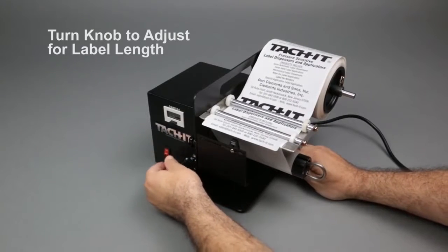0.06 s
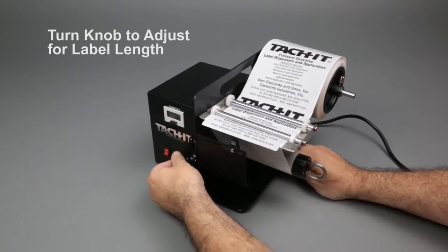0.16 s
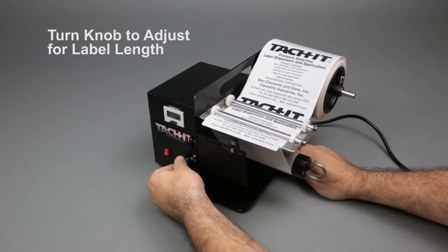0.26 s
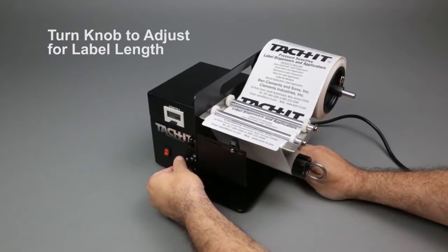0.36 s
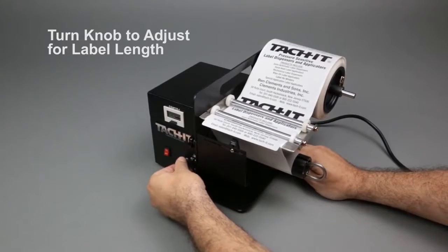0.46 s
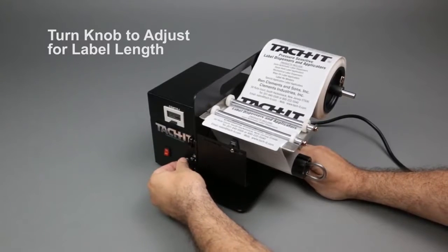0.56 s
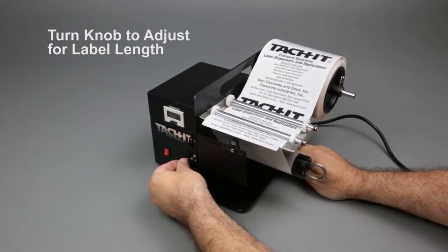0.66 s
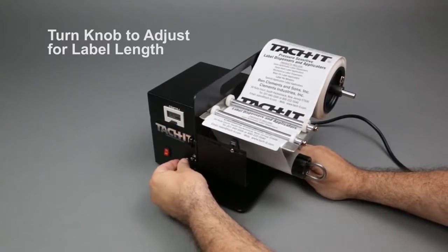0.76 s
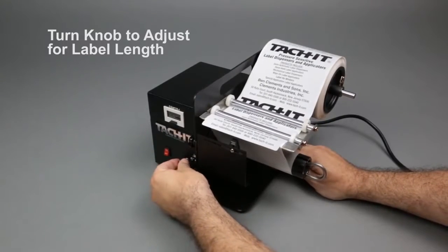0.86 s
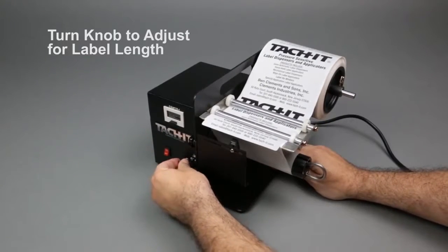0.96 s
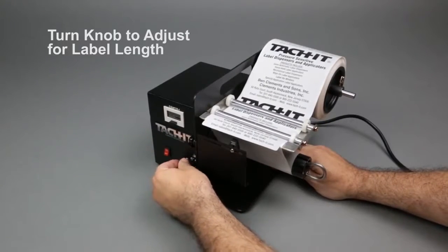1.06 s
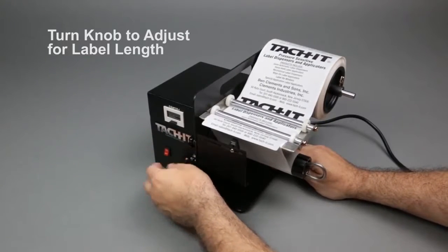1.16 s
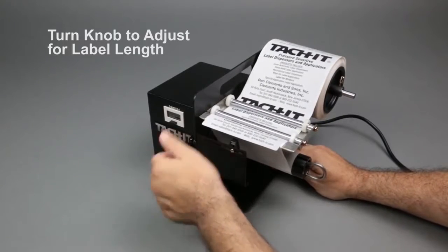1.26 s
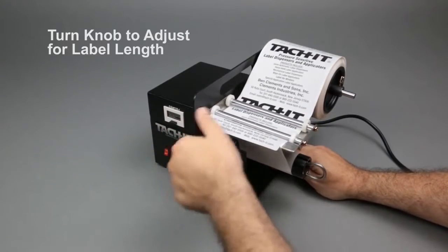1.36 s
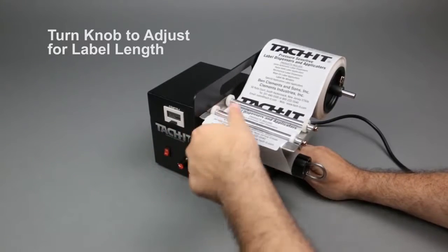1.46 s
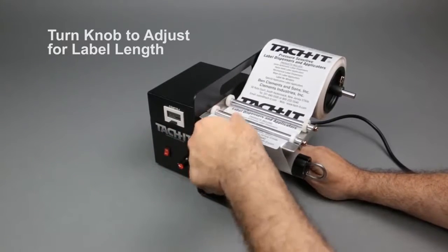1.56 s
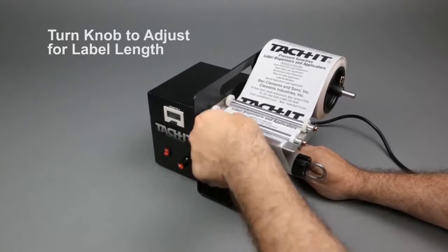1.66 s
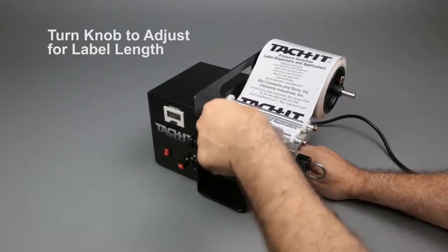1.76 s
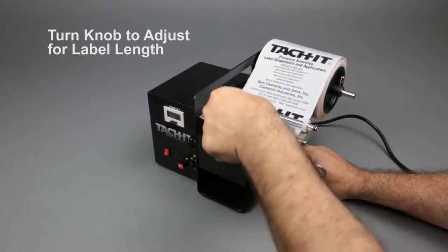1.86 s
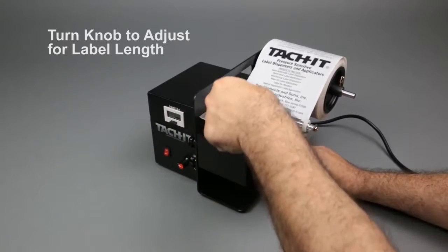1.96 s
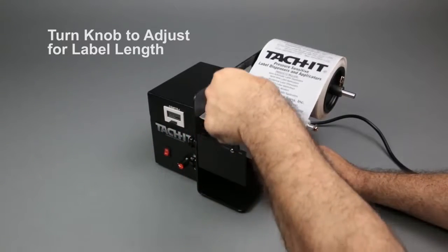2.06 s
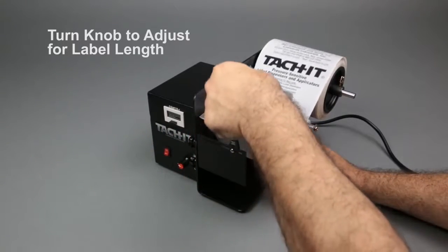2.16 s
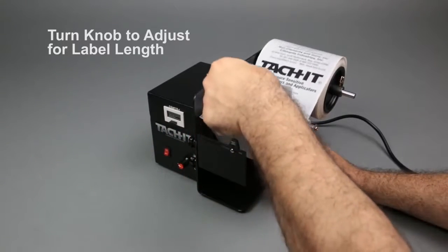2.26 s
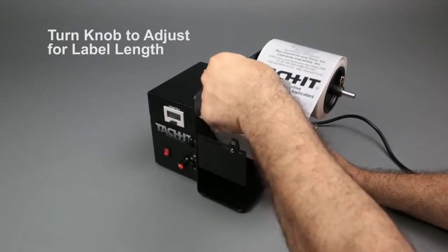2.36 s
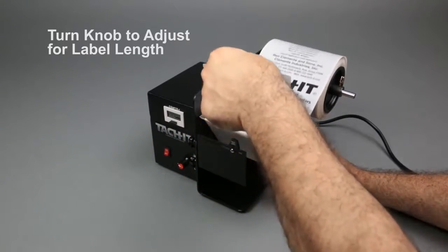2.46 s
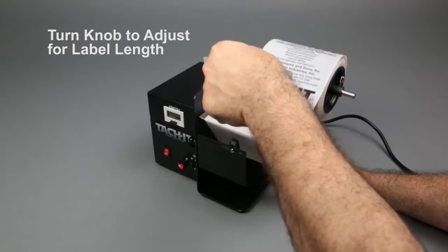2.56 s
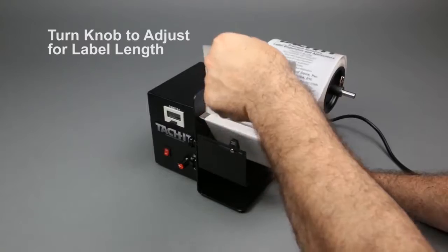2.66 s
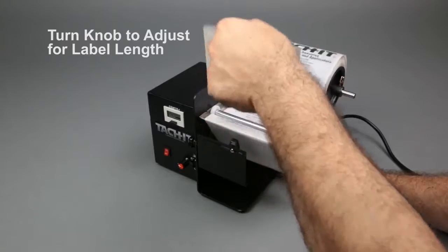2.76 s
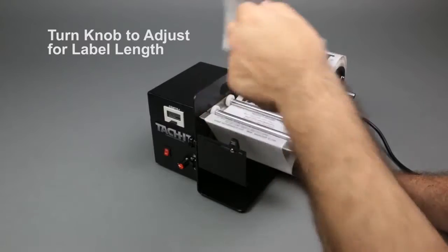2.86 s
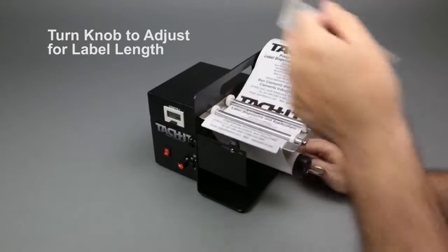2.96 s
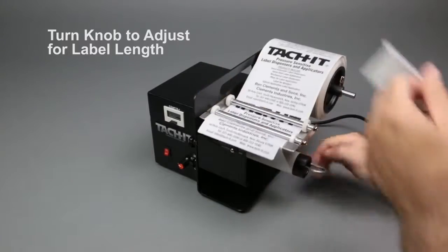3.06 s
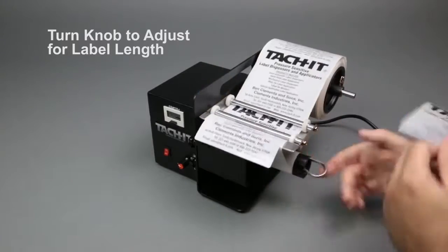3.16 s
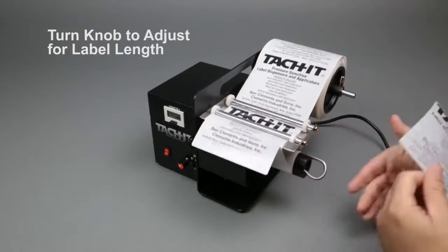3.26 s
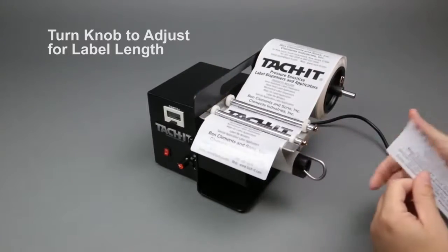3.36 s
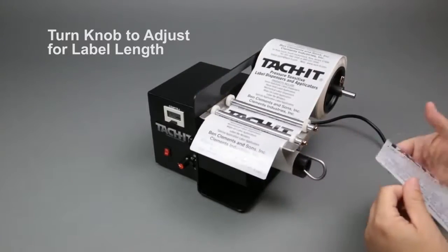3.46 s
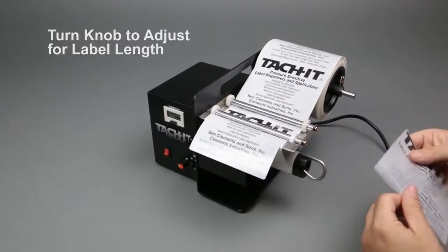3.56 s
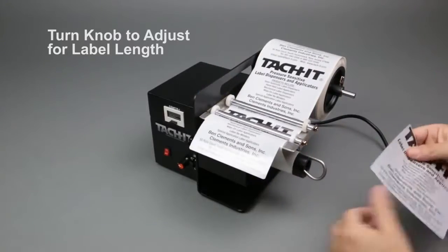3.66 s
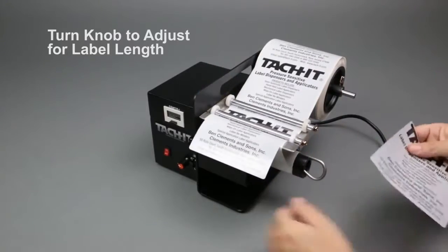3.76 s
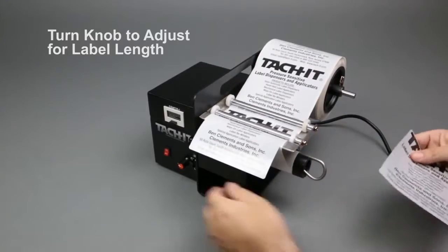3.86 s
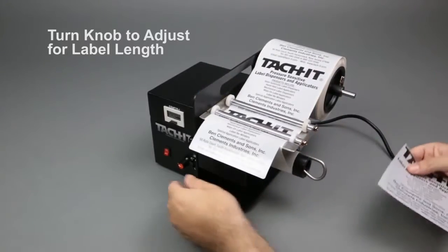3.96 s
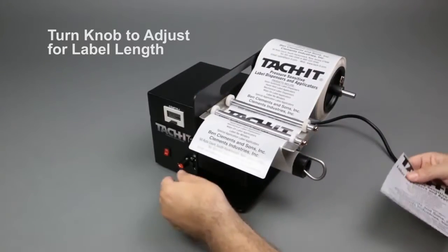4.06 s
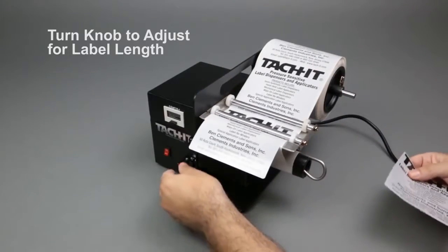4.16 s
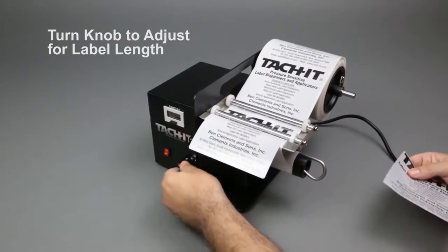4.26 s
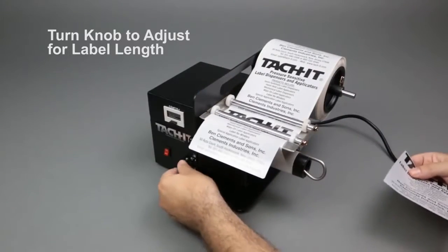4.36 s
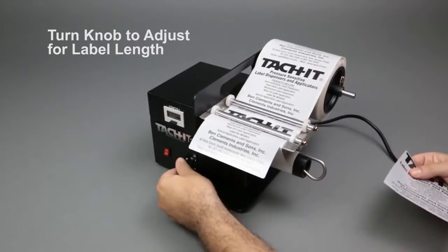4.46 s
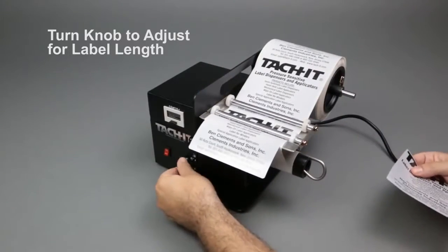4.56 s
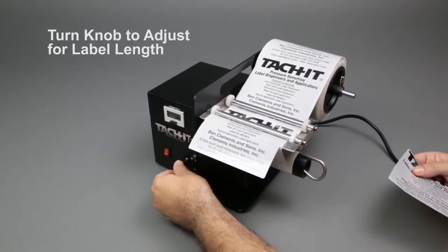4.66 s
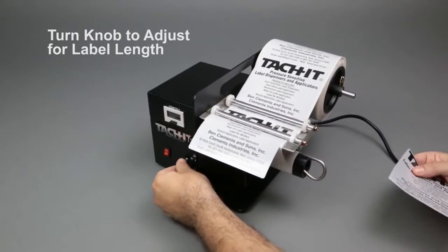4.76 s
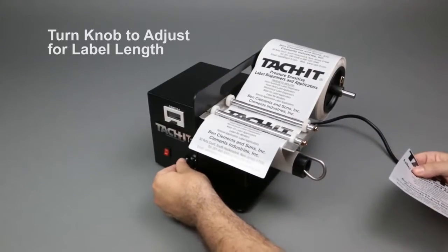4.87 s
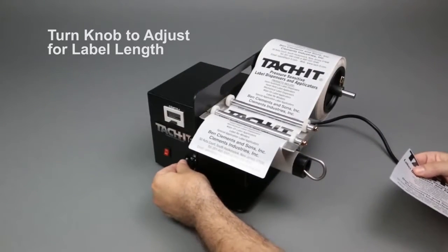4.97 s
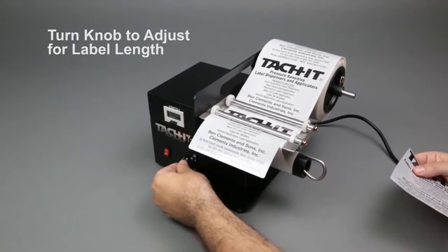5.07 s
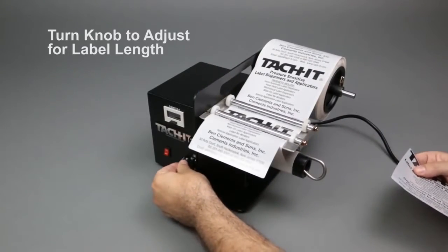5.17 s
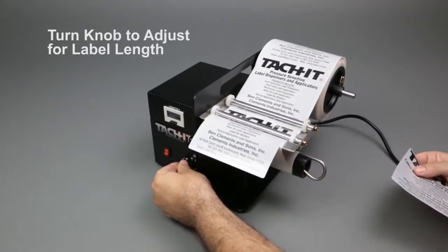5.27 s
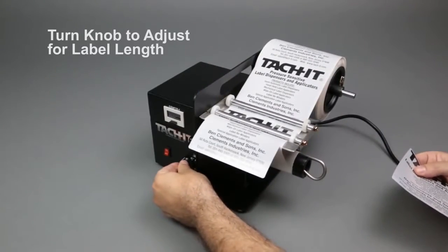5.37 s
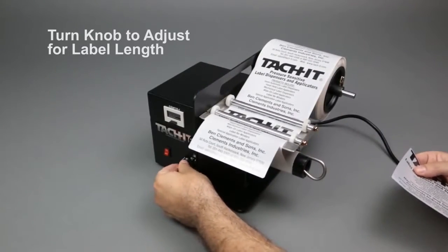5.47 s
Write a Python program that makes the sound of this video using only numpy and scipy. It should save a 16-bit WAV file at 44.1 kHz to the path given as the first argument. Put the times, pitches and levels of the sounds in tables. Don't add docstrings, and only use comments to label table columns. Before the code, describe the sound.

Quiet ticks, then one buzzy motor run with crisp adhesive peeling, a hard knock, a dull stopping clunk and brief sticky crackling in a quiet room.

```python
import sys
import numpy as np
from scipy import signal
from scipy.fft import rfft, irfft
from scipy.io import wavfile
from scipy.ndimage import uniform_filter1d

SR = 44100
rng = np.random.default_rng(int(sys.argv[2]) if len(sys.argv) > 2 else 0)


def store_pcm(level_fs):
    pcm = np.round(np.clip(level_fs, -1, 1) * 32767).astype(np.int16)
    wavfile.write(sys.argv[1], SR, np.atleast_2d(pcm).T)


def voltage_ratio(level):
    return 10 ** (np.asarray(level, float) / 20)


N = 243873
TIME = np.arange(N) / SR

# pitch_hz, width_hz, level_db
HOUSING_MODES = [(225, 46, -7), (292, 12.8, 4.5), (401, 47, 0.5), (683, 30, -2), (828, 63, -4),
                 (1200, 650, -17.5), (1430, 57, -13), (585, 490, -8)]
# pitch_hz, width_hz, level_db
GEARBOX_MODES = [(2650, 90, -7), (3160, 110, -7), (3710, 120, 1), (4230, 80, -8), (4910, 200, -5),
                 (6100, 200, -11), (7290, 150, -16), (9010, 200, -22)]
# pitch_hz, density_db_per_hz
GEAR_WASH = [(530, -41), (900, -6.5), (1230, -15), (1350, -11), (2200, -10), (2630, -6), (3770, -3.5),
             (6760, -9.5), (8580, -19), (11700, -21.5), (15600, -31)]
# pitch_hz, density_db_per_hz
PEEL_WASH = [(530, -22), (900, -10), (1270, -37), (1400, -7), (1650, -6.5), (2030, -1.5), (2310, -9),
             (3150, -0.5), (5650, 1.5), (6930, -1), (8480, -10), (11400, -12.5), (15600, -25)]
# pitch_hz, width_hz, level_db
LABEL_MODES = [(1370, 83, -6), (1980, 140, -5), (2650, 42, -6), (3150, 130, -2), (3760, 89, -2),
               (4510, 150, -2), (5020, 180, 0), (5460, 39, -3), (6120, 160, -3), (6890, 200, -4),
               (7480, 170, -7), (8120, 36, -10), (8770, 310, -13), (9870, 230, -15)]
# time_s, level_db
PULL = [(1.9, -65), (1.954, -45), (2.01, -49.5), (2.07, -44), (2.39, -42.5), (2.73, -43.5), (2.792, -45),
        (2.945, -48)]
# time_s, level_db
LOAD = [(1.91, -52.5), (1.986, -48), (2.04, -55.5), (2.088, -46), (2.3, -46), (2.67, -48), (2.748, -44),
        (2.885, -52), (2.95, -50)]
# centre_s, level_db, half_length_s
DRAGS = [(1.988, -65, .025), (2.09, -65, 0.025), (2.172, -60, .025), (2.27, -53, 0.032), (2.339, -63, .04),
         (2.514, -62, .07), (2.77, -57, .05), (3.0, -55.5, .06)]
# start_s, peak_db, body_hz, t60_s, bright_edge_db (re peak_db)
SNAPS = [(3.643, -50, 1790, 0.066, -14), (3.649, -44, 2500, .03, -1), (3.6525, -29, 2200, .04, -15),
         (3.656, -36, 580, 0.046, -4), (3.6635, -32, 1500, 0.031, -7), (3.671, -31, 910, 0.051, -11),
         (3.674, -32, 2500, 0.018, -9), (3.6795, -34, 1870, .028, -14), (3.688, -40.5, 1500, 0.14, -9),
         (3.726, -45.5, 7500, 0.16, -7), (3.732, -36.5, 1200, .04, -12), (3.7365, -29, 1300, 0.024, -2.5),
         (3.746, -41, 900, 0.091, -7), (3.7485, -35, 2450, 0.053, -13), (3.758, -51, 2000, 0.11, -8),
         (3.828, -50, 880, .043, -22)]
# pitch_hz, width_hz, level_db
HELD_SHEET = [(526, 110, -2), (1060, 180, -3), (1450, 71, -12), (2200, 210, 2.5), (2570, 180, -3),
              (2900, 180, -1), (4320, 390, -5), (7600, 420, -9)]
# start_s, peak_db, contact_ms, ring_scale (of t60), panel_hz
KNOCKS = [
    (1.91, -41, 0.98, 0.66, 378),
    (3.056, -24, 0.2, 0.055, 355),
]
# pitch_hz, level_db, t60_s
HOUSING_RING = [(590, -9, 0.065), (880, -16, 0.073), (1300, -14, .08), (1500, -19, 0.081),
                (3600, -11.5, 0.23)]
# start_s, peak_db, pitch_hz, width_octaves, after_ring_db (re tick)
TICKS = [(.115, -57, 3800, 1.2, -20), (0.1553, -44, 2900, 0.54, -14), (.1555, -53, 5700, .6, -25),
         (.188, -46.5, 3200, 1.4, -18), (1.506, -57.5, 3500, .5, 4), (1.657, -54, 3770, 1.4, -4),
         (1.906, -39, 7100, 1.6, -11), (3.2463, -25.5, 4300, 1.9, -27), (3.249, -28.5, 2000, 3.2, -25),
         (3.737, -33, 7600, 0.56, -15), (5.1449, -37.5, 3960, 0.42, -11), (5.1455, -50.5, 6170, 0.82, -25),
         (5.199, -52, 2700, .8, -15)]
# start_s, peak_db, pitch_hz, length_s
BRUSHES = [(1.527, -54.5, 5370, 0.079), (1.53, -59.5, 1100, 0.1), (1.689, -58, 4130, 0.27),
           (1.701, -61.5, 890, 0.14), (1.82, -57.5, 5400, 0.32)]
# start_s, peak_db, pitch_hz, t60_s
JOLTS = [(.131, -45, 230, 0.052), (.234, -55, 1140, 0.16), (.24, -63.5, 2920, 0.33), (1.92, -42, 1140, .12),
         (1.969, -35.5, 1500, 0.054), (2.725, -37.5, 1540, .1), (3.056, -31, 700, 0.025),
         (3.248, -40, 1500, 0.11), (3.404, -47, 2100, 0.21)]
# start_s, pitch_hz, level_db, swing (1 out, -1 in), t60_s
PANELS = [(.2338, 407, -41, 1, .21), (.2338, 443, -53, 1, .42), (.2338, 432, -54.5, -1, .46),
          (.2338, 372, -54, 1, .12), (.2338, 3570, -70, 1, .35), (.2338, 3600, -70, -1, .35),
          (1.506, 1640, -63, 1, .1), (1.53, 1690, -70, 1, .4), (1.506, 5850, -71, 1, .12),
          (3.384, 375, -30.5, 1, .085), (3.384, 410, -35, -1, .14), (3.384, 340, -41, -1, .22)]
# pitch_hz, density_db_per_hz
AIR = [(12, -43), (20, -17), (85, -8.5), (116, -4.5), (153, -11.5), (171, -3.5), (191, -2), (353, -8),
       (394, -12), (860, -15.5), (1050, -20), (1270, -20), (1540, -23), (3980, -31), (15600, -32.5)]
# pitch_hz, density_db_per_hz
SIDE_HISS = [(12, -15), (20, 7), (113, -6.5), (245, -11), (453, -9), (1630, -8), (15600, -7)]

START_S, STOP_S = 1.905, 3.373
COAST_LAG_S = 0.039
FREE_S = 2.945
DRIVE_END_S = 3.384


def dispenser():
    hiss = gears() + peeling()
    bounce_s = 1 / 625
    bounce = voltage_ratio(-22.5) * np.interp(TIME - bounce_s, TIME, hiss)
    return housing_rumble() + hiss + bounce + mains_hum()


def gears():
    teeth = clicks(12000, spread_db=1.3) * (1 + 0.3 * torque()) * voltage_ratio(0.8 * walk(30))
    damping = np.where(TIME < FREE_S, voltage_ratio(-10), 1)
    whine = level(resonate(teeth, GEARBOX_MODES, flicker_db=1.2, rate=35), -4)
    rattle = whine * damping * (TIME < DRIVE_END_S) + level(colour(teeth, GEAR_WASH), -1.63)

    taut_ease_s = 0.085
    taut = ramp(2.08, 2 * taut_ease_s) - ramp(2.71 - taut_ease_s, taut_ease_s)
    sag_db = 2.5 * (TIME - START_S)
    gain_db = -41 - sag_db - 7 * taut - 2.5 * swell(FREE_S + 0.023, 0.046)
    braked = voltage_ratio(-3 * ramp(STOP_S, COAST_LAG_S))
    return running() * braked * voltage_ratio(gain_db) * rattle


def peeling():
    snaps = clicks(12000, spread_db=1.6) * voltage_ratio(0.9 * walk(50) + 0.5 * walk(12))
    label = level(resonate(snaps, LABEL_MODES, flicker_db=2.5, rate=20), -2)
    label = label + level(colour(snaps, PEEL_WASH), 1.0)
    return label * voltage_ratio(np.interp(TIME, *np.transpose(PULL), left=-120, right=-120))


def housing_rumble():
    rumble = resonate(clicks(2500, spread_db=1.5), HOUSING_MODES, flicker_db=3.0, rate=24)
    load = voltage_ratio(np.interp(TIME, *np.transpose(LOAD)))
    return np.sqrt(running()) * (TIME > START_S) * load * level(rumble, 0)


def mains_hum():
    drags = sum(voltage_ratio(db) * swell(s, half_s) for s, db, half_s in DRAGS)
    release = 1 - 0.61 * ramp(STOP_S - 0.02, 0.031)
    feed = voltage_ratio(-60) * ramp(2.78, 0.08) * release * (TIME < STOP_S + 0.13)
    return np.maximum(drags, feed) * voltage_ratio(1.7 * walk(18)) * np.sqrt(2) * torque()


def torque():
    return np.sin(2 * np.pi * 120 * TIME)


def running():
    coast_db = -340 * np.maximum(TIME - STOP_S - COAST_LAG_S, 0)
    return ramp(START_S, 0.041) ** 2 * voltage_ratio(coast_db)


def crackle():
    octaves, rise_s = 1.68, 0.00085
    bodies, edges, thuds = [], [], []
    for s, db, hz, t60, edge_db in SNAPS:
        bodies.append((s, db - 5.5, hz, octaves, rise_s, t60))
        edges.append((s, db + edge_db, 4650, 1.2, 0.00041, 0.58 * t60))
        thuds.append((s, db - 11.5, 328, 1.23, 2 * rise_s, t60))
    snaps = paper(bodies + edges + thuds, grain_db=1.0)
    sheet = sum(voltage_ratio(db) * mode(snaps, hz, width) for hz, width, db in HELD_SHEET)
    return snaps + voltage_ratio(7.0) * sheet


def knocks():
    out, t = np.zeros(N + SR), np.arange(SR // 2) / SR
    for s, db, contact_ms, scale, panel_hz in KNOCKS:
        ring = 0
        for hz, mode_db, t60 in [(panel_hz, 0, 0.17)] + HOUSING_RING:
            ring = ring + voltage_ratio(mode_db) * np.sin(2 * np.pi * hz * t) * decay(t, t60 * scale)
        blow = ring * (1 - np.exp(-t * 1000 / contact_ms))
        out[int(s * SR):][:len(t)] += voltage_ratio(db) * blow / np.abs(blow).max()
    return signal.sosfilt(signal.butter(3, 190, "high", fs=SR, output="sos"), out[:N])


def handling():
    events = []
    for s, db, hz, octaves, ring_db in TICKS:
        events.append((s, db, hz, octaves, 0.00028, 0.0094))
        events.append((s + 0.001003, db + ring_db, hz, 0.19, 0.00086, 0.071))
    for s, db, hz, length_s in BRUSHES:
        events.append((s, db, hz, 1.48, 0.19 * length_s, length_s))
    for s, db, hz, t60 in JOLTS:
        events.append((s, db, hz, 0.87, 0.0037, t60))
    return paper(events, grain_db=3.5)


def paper(events, grain_db):
    out, t = np.zeros(N + SR), np.arange(SR // 3) / SR
    for s, db, hz, octaves, rise_s, t60 in events:
        noise, grain = rng.standard_normal((2, len(t)))
        edges = np.minimum(hz * 2 ** (np.array([-0.5, 0.5]) * octaves), [14000, 19000])
        band = signal.butter(3, edges, "band", fs=SR, output="sos")
        spray = signal.sosfilt(band, noise * voltage_ratio(grain_db * grain))
        shape = (1 - np.exp(-t / rise_s)) * decay(t, t60)
        out[int(s * SR):][:len(t)] += level(spray, db - 8) * shape / shape.max()
    return out[:N]


def panels():
    out = np.zeros(N)
    for s, hz, db, swing, t60 in PANELS:
        since = np.maximum(TIME - s, 0)
        out += swing * voltage_ratio(db) * np.sin(2 * np.pi * hz * since) * decay(since, t60)
    return out


def room(x):
    t60 = 0.26
    t = np.arange(SR // 2) / SR
    noise = rng.standard_normal(len(t))
    dull = uniform_filter1d(noise, size=6)
    tail = dull * decay(t, t60) + 0.5 * (noise - dull) * decay(t, 1.25 * t60)
    tail = tail * (t > 0.004)
    tail = tail / np.sqrt(np.sum(tail ** 2))
    return x + voltage_ratio(-12.5) * signal.fftconvolve(x, tail)[:N]


def air():
    noise = colour(rng.standard_normal(N), AIR)
    rumble = signal.sosfilt(signal.butter(1, 500, fs=SR, output="sos"), noise)
    return level(noise + rumble * (voltage_ratio(0.4 * walk(11)) - 1), -61.5)


def clicks(rate, spread_db):
    size = voltage_ratio(spread_db * np.minimum(rng.exponential(size=N), 5)) * rng.standard_normal(N)
    return size * (rng.random(N) < rate / SR)


def mode(x, hz, width):
    return signal.lfilter(*signal.iirpeak(hz, hz / width, fs=SR), x)


def resonate(x, modes, flicker_db, rate):
    out = np.zeros(N)
    for k, (hz, width, db) in enumerate(modes):
        drive = np.roll(x, 997 * k)
        out += voltage_ratio(db + flicker_db * walk(rate)) * mode(drive, hz, width)
    return out


def walk(rate):
    k = int(SR / rate)
    steps = np.repeat(rng.standard_normal(N // k + 1), k)
    return 1.3 * uniform_filter1d(uniform_filter1d(steps, k), k)[:N]


def ramp(s, ease):
    return np.clip((TIME - s) / ease, 0, 1)


def swell(s, half):
    return np.exp(-((TIME - s) / half) ** 2)


def decay(t, t60):
    return 1000.0 ** (-t / t60)


def level(x, db):
    return x * voltage_ratio(db) / np.sqrt(np.mean(x ** 2))


def colour(x, points):
    hz, db = np.transpose(points)
    f = np.maximum(np.arange(len(x) // 2 + 1) * SR / len(x), 1)
    return irfft(rfft(x) * voltage_ratio(np.interp(np.log(f), np.log(hz), db)), len(x))


def scene():
    mid = room(dispenser() + crackle() + knocks() + handling()) + panels() + air()
    return np.array([mid, mid])


def roll_off(x):
    return signal.sosfilt(signal.butter(12, 15740, fs=SR, output="sos"), x)


def record(dry):
    side = level(colour(rng.standard_normal(N), SIDE_HISS), -71)
    top = signal.ellip(8, 0.2, 70, 15700, fs=SR, output="sos")
    mix = signal.sosfilt(top, dry + np.array([side, -side]))
    return roll_off(mix)


dry = scene()
out = record(dry)
store_pcm(out)
```